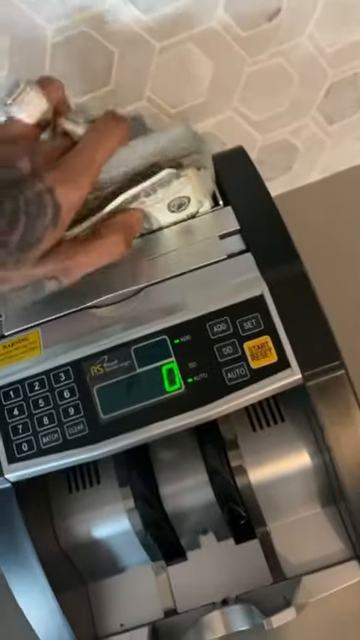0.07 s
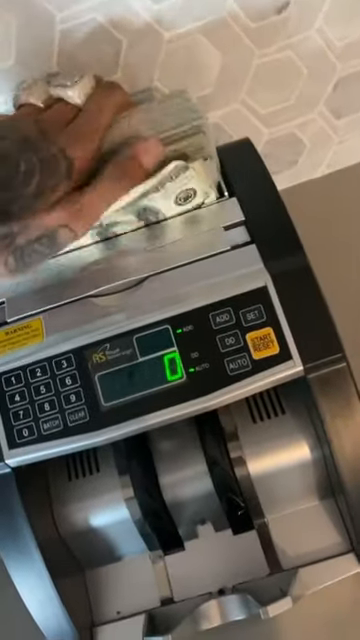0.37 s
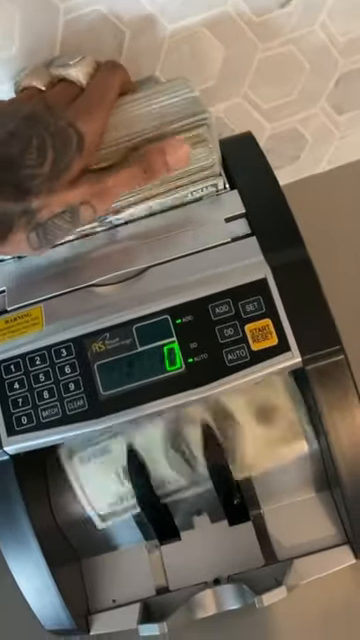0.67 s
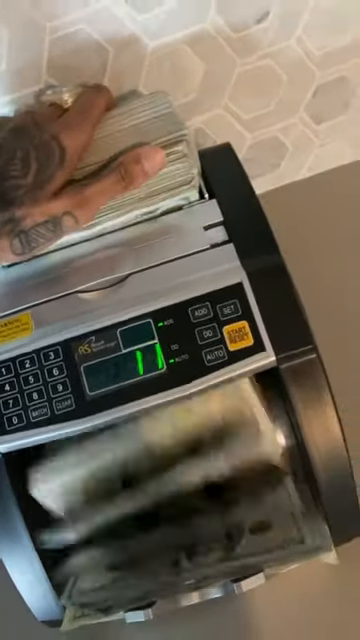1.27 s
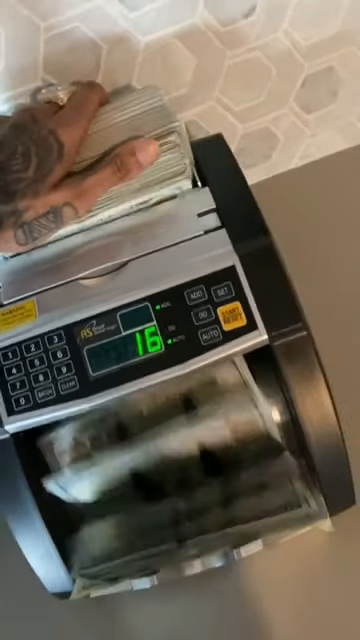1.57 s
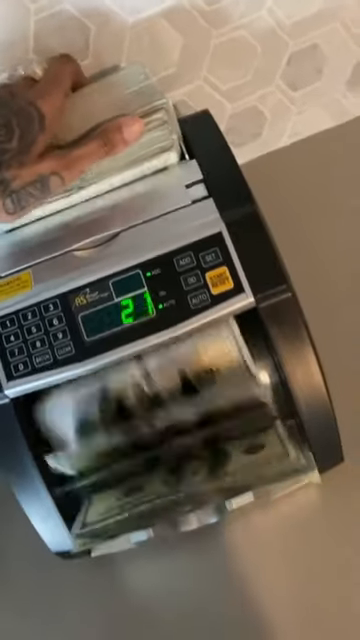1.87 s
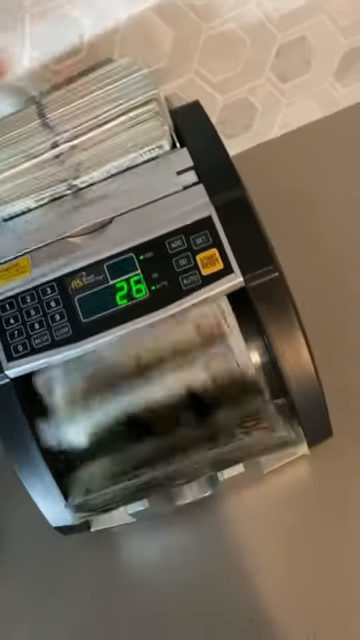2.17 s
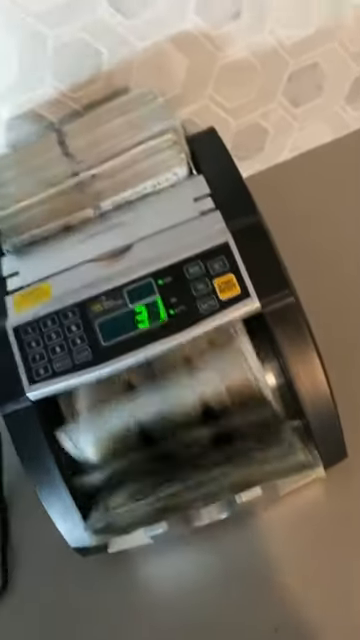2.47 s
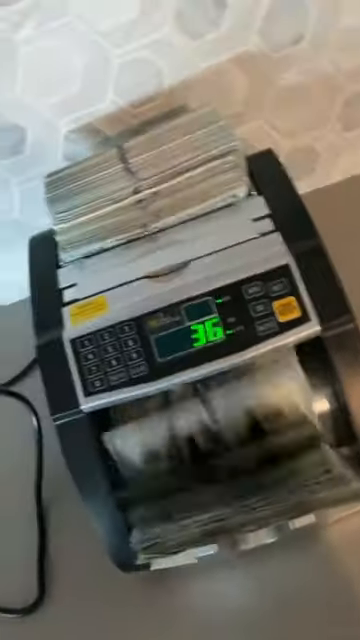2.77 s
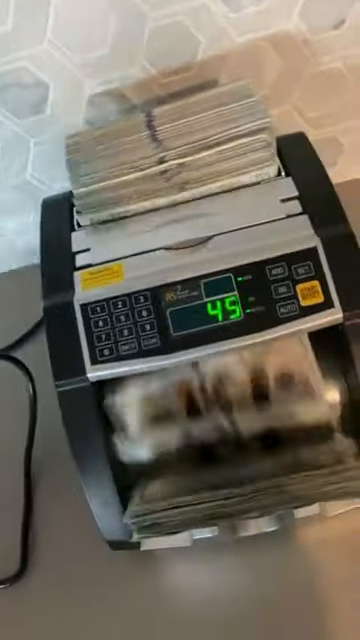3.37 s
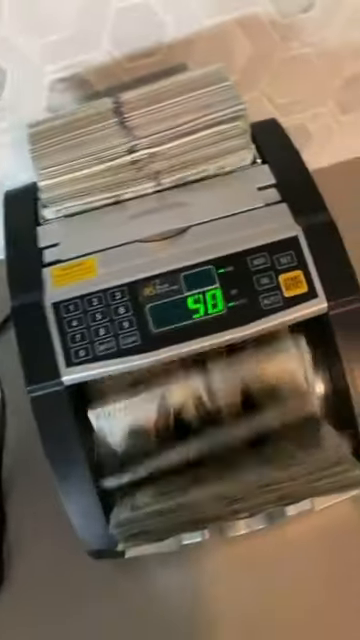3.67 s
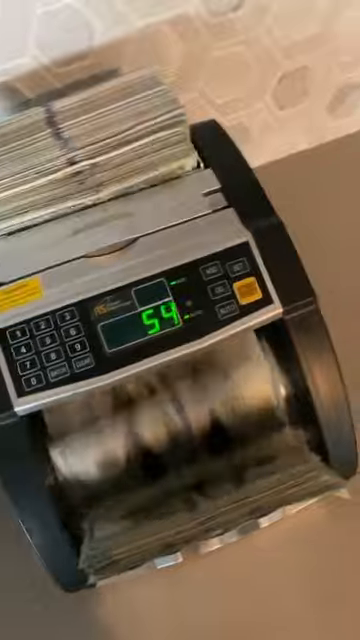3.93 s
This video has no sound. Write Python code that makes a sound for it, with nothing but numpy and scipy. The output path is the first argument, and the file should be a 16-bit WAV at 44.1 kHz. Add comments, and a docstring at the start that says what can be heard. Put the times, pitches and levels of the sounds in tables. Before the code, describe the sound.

A money counter riffles quickly through paper bills, starting just after a brief rustle and a few clicks of loading. Its motor hums and its plastic case rattles as the notes snap and chug through, heard close up indoors.

```python
"""A soft rustle and a few clicks, close by: a hand settles a stack in a banknote counter on a counter top.
Then the motor starts, and rollers rattle the plastic case over a mains hum and a gear whine.
About fifteen notes a second rub off the stack and snap into the stacker with a chug.
The case booms less as the tray fills, and a small hard room answers."""
import sys
import numpy as np
from scipy import signal
from scipy.fft import rfft, irfft
from scipy.io import wavfile
from scipy.ndimage import uniform_filter1d

SR = 44100
rng = np.random.default_rng(int(sys.argv[2]) if len(sys.argv) > 2 else 0)


def bounce(signal):
    """Save signal as a 16-bit WAV file at the path given by the first command-line argument."""
    frames = np.transpose(np.atleast_2d(signal))
    limited = np.clip(frames, -1, 1)
    pcm = np.round(limited * 32767).astype(np.int16)
    wavfile.write(sys.argv[1], SR, pcm)


N = 176400

# notes snapping into the stacker: start_s, level_db, treble_db, ring_hz, decay_s, top_db
# (levels are relative: treble to the snap's body, top to its treble)
SNAPS = [(0.6173, -10, 0.5, 2340, 0.0017, -4), (0.7297, -8.5, -9.5, 3740, 0.0027, -5),
         (0.7883, -6.5, -10, 2470, 0.0016, -6), (0.9564, -3.5, -8, 2900, 0.002, -1),
         (0.9981, -9, -28, 2310, 0.0016, 2), (1.1314, -10, -2.5, 2060, 0.0031, -0.5),
         (1.259, -12.5, -2, 2760, 0.006, -6), (1.361, -4, -10, 2430, 0.0018, 1),
         (1.5336, -14, -14, 2440, 0.0069, -3), (1.547, -12.5, -1, 4980, 0.0091, -10),
         (1.7091, -8.5, -7.5, 2610, 0.002, 5), (1.7693, -13, -8, 2970, 0.0035, -3),
         (2.1323, -11.5, -32, 1270, 0.0036, 0), (2.1952, -13, -2.5, 3900, 0.0037, -7),
         (2.2667, -6.5, -5, 2560, 0.0027, 0), (2.364, -25.5, 12, 5460, 0.0018, -18),
         (2.5205, -8.5, -11, 4560, 0.0029, -3), (2.6873, -10, 0.5, 4300, 0.0045, 3),
         (2.7025, -17, 5, 4500, 0.0027, -12), (2.7618, -22.5, 12, 4680, 0.0045, -7),
         (2.9553, -9.5, -6, 3830, 0.0051, -2.5), (3.032, -6.5, -3.5, 2240, 0.0035, -1),
         (3.1106, -9, -23, 2010, 0.003, -13), (3.1755, -9, -2.5, 2060, 0.011, 1),
         (3.2501, -14, -3.5, 2500, 0.0055, -13), (3.3127, -11, -2, 2540, 0.0046, -6),
         (3.4437, -11.5, -1.5, 2620, 0.0066, -1), (3.5099, -7, -5.5, 2300, 0.0097, -16),
         (3.5813, -7.5, -2.5, 4500, 0.0053, -1.5), (3.6479, -14, -4, 4270, 0.0051, -2),
         (3.7713, -4, -49, 2070, 0.0057, -4), (3.8331, -10, -1, 2370, 0.006, 1)]
# the rubbing as heard, with the highs stepping down above 9 kHz: frequency_hz, gain_db
RUB_COLOUR = [(30, -13), (300, -6.5), (1000, -1), (1750, -0.5), (2100, -0.5), (2700, -0.5), (3250, 1),
              (4000, 3.5), (4500, 0), (5300, -2.5), (6300, -1), (7700, 0), (8500, -1.5), (9500, -15),
              (14000, -8.5)]
SNAP_TRIM_DB, TRAY_KNOCK_HZ = -9, 436


def undb(db):
    """Decibels to gain."""
    return 10 ** (np.asarray(db) / 20)


def unit(x):
    """Scale to rms 1."""
    return x / np.sqrt(np.mean(x ** 2))


def burst(x):
    """Scale so that the loudest 4 ms have rms 1."""
    return x / np.sqrt(uniform_filter1d(x ** 2, size=176).max())


def fader(t, points):
    """Gain riding along (time_s, level_db) points."""
    return undb(np.interp(t, *np.array(points).T))


def wander(per_s):
    """Smooth random drift, rms 1."""
    hold = int(SR / per_s)
    steps = rng.standard_normal(2048)[np.arange(N) // hold]
    return unit(uniform_filter1d(uniform_filter1d(steps, hold), hold))


def ring(x, hz, width_hz):
    """One resonance, gain 1 at its centre."""
    return signal.lfilter(*signal.iirpeak(hz, hz / width_hz, fs=SR), x)


def noise_band(size, hz, width_hz):
    """Noise in a steep resonance, rms 1."""
    return unit(ring(ring(rng.standard_normal(size), hz, width_hz), hz, width_hz))


def colour(x, points):
    """Minimum-phase EQ through (frequency_hz, gain_db) points: nothing rings ahead of a click."""
    hz, db = np.array(points).T
    size = 2048
    log_hz = np.log(np.fft.rfftfreq(size, 1 / SR) + 1)
    gain = undb(np.interp(log_hz, np.log(hz), db))
    cepstrum = irfft(np.log(gain))
    cepstrum[1:size // 2] *= 2
    cepstrum[size // 2:] = 0
    impulse = irfft(np.exp(rfft(cepstrum)))[:size // 2]
    return signal.fftconvolve(x, impulse)[:len(x)]


def grains(per_s, size):
    """Tiny clicks of random strength at random moments, rms 1."""
    return unit(rng.standard_normal(size) * (rng.random(size) < per_s / SR))


def add(out, start_s, x):
    """Mix a sound in at its cue."""
    i = int(start_s * SR)
    out[i:i + len(x)] += x[:len(out) - i]


def thumps(t, cues, pitch_hz, length_s):
    """Short dull blows of a few cycles, one for each (start_s, level_db) cue."""
    out, u = np.zeros(N), t[:SR // 10]
    blow = burst(np.sin(2 * np.pi * pitch_hz * u) * u * np.exp(-2 * u / length_s))
    for start_s, level_db in cues:
        add(out, start_s, undb(level_db) * blow)
    return out


def feed_cycle(t, notes_per_s=14.7):
    """The load swings once a note from the first snap to the last; quiet notes fill the gaps."""
    snap_times = np.sort([row[0] for row in SNAPS])
    notes_per_gap = np.round(np.diff(snap_times) * notes_per_s)
    notes_fed = np.concatenate([[0], np.cumsum(notes_per_gap)])
    return np.sqrt(2) * np.cos(2 * np.pi * np.interp(t, snap_times, notes_fed))


def loading(t):
    """The stack rustles softly under the hand and clicks against the hopper."""
    # the hand sliding on the stack: time_s, level_db
    hand_levels = [(0, -42), (.05, -55.5), (.11, -51), (.19, -66), (.21, -50.5), (.32, -64), (.36, -57),
                   (.48, -57), (.6, -75)]
    # the rustle as heard, with the highs stepping down above 9 kHz: frequency_hz, gain_db
    hand_colour = [(200, 4.5), (1400, -5.5), (2400, -1), (4500, -6.5), (8700, -13), (9600, -21),
                   (14000, -21)]
    # the stack tapping the hopper: start_s, level_db
    taps = [(0.0605, -35), (0.2004, -36), (0.274, -54), (0.3412, -47), (0.4030, -24.5)]
    # a tap as heard, with the highs stepping down above 9 kHz: frequency_hz, gain_db
    tap_colour = [(30, -31), (150, 0), (900, -1.5), (1500, -5), (2200, 9), (3200, 3), (3700, 2),
                  (5000, -0.5), (7000, -8), (8700, 2), (9600, -16), (14000, -18)]
    out = unit(colour(grains(per_s=14000, size=N), hand_colour)) * fader(t, hand_levels)
    u, tap_decay_s = t[:SR // 10], 0.0033
    for start_s, level_db in taps:
        click = rng.standard_normal(len(u)) * np.sqrt(u) * np.exp(-u / tap_decay_s)
        add(out, start_s, undb(level_db) * burst(colour(click, tap_colour)))
    return out


def rollers(t, trim_db=-0.5):
    """Rollers and stacker vanes pepper the plastic case with tiny blows that set it rattling."""
    # resonances of the case: pitch_hz, width_hz, gain_db
    case_modes = [(221, 55, -5), (372.4, 41.3, 1.5), (434, 71.4, -1), (497.4, 89, -1.5), (621, 84, -4.5),
                  (871, 62, -6), (1119, 23, -8.5), (1334, 29, -12.5), (1650, 43, -25.5)]
    # the rattle, easing as the tray fills: time_s, level_db (before the trim)
    rattle_levels = [(.45, -83), (.5, -42.5), (.57, -28), (.63, -23.5), (1.0, -25), (1.2, -26.5),
                     (1.45, -25.5), (2.3, -29), (4, -31)]
    blows = grains(per_s=900, size=N)
    case = sum((-1) ** k * undb(gain_db) * ring(blows, hz, width_hz)  # modes alternate in polarity
               for k, (hz, width_hz, gain_db) in enumerate(case_modes))
    return unit(case) * fader(t, rattle_levels) * undb(trim_db)


def rubbing(t):
    """Paper hisses and crackles as each note is pulled off the stack, ringing now one guide, now another."""
    # paper running through the rollers: time_s, level_db
    rub_levels = [(.46, -84), (.5, -39), (.535, -35.5), (.555, -24), (.64, -24.5), (.76, -24), (.85, -27.5),
                  (1.1, -25), (1.35, -28), (1.8, -29), (2.3, -29), (2.48, -26), (2.7, -22.5), (2.8, -28.5),
                  (2.95, -30), (3.4, -30), (4, -30)]
    # resonances of the paper guides: pitch_hz
    guide_pitches = [2390, 2660, 4530, 4840, 5320]
    crackle_db, pulse_db, flicker_db = -4, 1.1, 1.9
    guide_db, guide_waver_db = -6, 4
    friction = rng.standard_normal(N) + undb(crackle_db) * grains(per_s=1500, size=N)
    force = friction * undb(pulse_db * feed_cycle(t) + flicker_db * wander(per_s=110))
    guides = sum(ring(force * undb(guide_waver_db * wander(per_s=40.1)), hz, width_hz=190)
                 for hz in guide_pitches)
    rub = unit(unit(colour(force, RUB_COLOUR)) + undb(guide_db) * unit(guides))
    hiss = signal.sosfiltfilt(signal.butter(6, 8800, "high", fs=SR, output="sos"), rub)
    hiss_lift = fader(t, [(2.0, 3), (2.8, 0.5)])  # the top softens partway through the run
    return (rub + hiss * (hiss_lift - 1)) * fader(t, rub_levels)


def motor(t, start_s=0.54, spin_up_s=0.11):
    """Mains hum, bearing rumble and wavering gear tones fade in; the gears throb with each note."""
    # gear whine: pitch_hz, level_db
    gear_tones = [(366, -42.5), (501.5, -42), (673, -50), (911, -49)]
    hum_hz, hum_db, hum_waver_db, rumble_db = 119.4, -41.5, 0.5, -48.5
    speed_jitter, gear_waver_db, throb_db, throb_lag_s = 0.011, 3.5, 3.2, 0.008
    hum = np.sqrt(2) * undb(hum_db + hum_waver_db * wander(per_s=12)) * np.sin(2 * np.pi * hum_hz * t)
    gear_time = np.cumsum(1 + speed_jitter * wander(per_s=70)) / SR
    load = feed_cycle(t - throb_lag_s)
    whine = np.zeros(N)
    for hz, level_db in gear_tones:
        swell = undb(gear_waver_db * wander(per_s=30) + throb_db * load)
        whine += undb(level_db) * unit(swell * np.sin(2 * np.pi * hz * gear_time))
    rumble = undb(rumble_db) * noise_band(N, hz=108, width_hz=40)
    return (hum + rumble + whine) * np.clip((t - start_s) / spin_up_s, 0, 1)


def drags(t, below_snap_db=22, rise_s=0.0043):
    """A note scrapes louder for a moment until it snaps free."""
    out, u = np.zeros(N), t[:SR // 20]
    swell = np.exp((u - u[-1]) / rise_s)
    for snap_s, level_db, *_ in SNAPS:
        scrape = burst(colour(rng.standard_normal(len(u)) * swell, RUB_COLOUR))
        add(out, snap_s - u[-1], undb(level_db + SNAP_TRIM_DB - below_snap_db) * scrape)
    return out


def snaps(t):
    """A note cracks taut in a cluster of clicks, rings briefly, strikes the tray and slides to rest."""
    # tone of a snap's body: frequency_hz, gain_db
    body_colour = [(30, -35), (200, -21), (900, 3), (1700, -5), (2300, 2.5), (2900, 1), (3900, 4),
                   (5000, -1.5), (14000, -43)]
    # its crisp edge as heard, with the highs stepping down above 9 kHz: frequency_hz, gain_db
    edge_colour = [(2000, -23.5), (3600, 2.5), (4400, 17), (6200, 8.5), (8300, 8), (9500, -7.5),
                   (14000, -4.5)]
    # resonances of the stacker tray: pitch_hz, width_hz, gain_db
    tray_modes = [(910, 82, -2), (1173, 47, 5.5), (1282, 81, 3.5), (1615, 87, 3.5), (2080, 85, 8),
                  (2500, 80, 4.5), (2640, 150, 1.5)]
    rise_s, slide_s, slide_db = 0.00075, 0.016, -24.5
    tray_db, edge_lift_db, thud_db = -1.5, 3.5, -16.5
    pop_width_hz, thud_width_hz = 350, 270
    out, u = np.zeros(N), t[:SR // 10]
    attack = np.minimum(u / rise_s, 1)
    since_peak = np.maximum(u - 2 * rise_s, 0)
    slide = undb(slide_db) * np.exp(-since_peak / slide_s)
    for start_s, level_db, treble_db, ring_hz, decay_s, top_db in SNAPS:
        release = np.exp(-(since_peak / decay_s) ** 2 / 2)
        crack = grains(per_s=9000, size=len(u)) * attack * (release + slide)
        tray = burst(sum(undb(db) * ring(crack, hz, width_hz) for hz, width_hz, db in tray_modes))
        pop = burst(np.sin(2 * np.pi * ring_hz * u) * u * np.exp(-np.pi * pop_width_hz * u))
        pop_db = 1.5 - 0.18 * treble_db  # duller snaps ring more
        body = burst(burst(colour(crack, body_colour)) + undb(tray_db) * tray + undb(pop_db) * pop)
        top_shelf = [(5030, 0), (7500, top_db)]
        edge = colour(burst(colour(crack, edge_colour)), top_shelf)
        thud = burst(ring(ring(crack, TRAY_KNOCK_HZ, thud_width_hz), TRAY_KNOCK_HZ, thud_width_hz))
        snap = body + undb(treble_db + edge_lift_db) * edge + undb(thud_db) * thud
        add(out, start_s, undb(level_db + SNAP_TRIM_DB) * snap)
    return out


def bumps(t):
    """Two dull low bumps, one early in the run and one late."""
    # low bumps: start_s, level_db
    cues = [(.655, -40), (3.724, -34)]
    return thumps(t, cues, pitch_hz=88, length_s=0.014)


def landings(t, pitch_hz=505, pitch_spread=0.035, rise_s=0.011):
    """The chug: a note swishes into the stacker, which swells into a short, rough ring."""
    # notes thumping the stacker: start_s, level_db (before the trim)
    cues = [(0.728, -24), (0.826, -27), (0.9, -26), (1.141, -21.5), (1.203, -21.5), (1.249, -25.5),
            (1.307, -20.5), (1.371, -28), (1.414, -15.5), (1.468, -21.5), (1.531, -18), (1.584, -19),
            (1.65, -19), (1.699, -30), (1.762, -20), (1.826, -18.5), (1.893, -18), (1.956, -24),
            (2.076, -25), (2.138, -28), (2.325, -23.5), (2.41, -21.5), (2.503, -39), (2.68, -24.5),
            (2.742, -26), (2.825, -19.5), (2.893, -26), (2.948, -29), (3.038, -25), (3.103, -28),
            (3.169, -26.5), (3.253, -30), (3.387, -23.5), (3.456, -33), (3.513, -30), (3.587, -23.5),
            (3.653, -29), (3.713, -23.5), (3.837, -29), (3.954, -30)]
    trim_db, rough_db, swish_db = -1.5, -9, -30
    out, u = np.zeros(N), t[:SR // 10]
    swell = (u / rise_s) ** 2 * np.exp(-2 * u / rise_s)
    for start_s, level_db in cues:
        hz = pitch_hz * (1 + pitch_spread * rng.standard_normal())
        tone = np.sqrt(2) * np.sin(2 * np.pi * (hz * u + rng.random()))
        roughness = undb(rough_db) * noise_band(len(u), hz, width_hz=hz)
        chug = burst(swell * (tone + roughness))
        swish = burst(colour(swell * rng.standard_normal(len(u)), RUB_COLOUR))
        add(out, start_s, undb(level_db + trim_db) * chug + undb(swish_db) * swish)
    return out


def knocks(t):
    """Early notes knock on the nearly empty tray."""
    # knocks on the tray: start_s, level_db
    cues = [(.942, -12.5), (1, -13), (1.0578, -14.5)]
    return thumps(t, cues, TRAY_KNOCK_HZ, length_s=0.0025)


def room(dry, t, wet_db=-16.5, t60_s=0.24, predelay_s=0.0021, air_db=-57):
    """The wall and counter top add dense reflections, over a faint bed of room tone."""
    # room tone: frequency_hz, gain_db
    air_colour = [(25, -9), (65, 18), (250, 1), (450, 8), (1500, -12), (6000, -33), (14000, -50)]
    u = t[:SR // 2]
    tail = grains(per_s=4000, size=len(u)) * undb(-60 * u / t60_s) * (u > predelay_s)
    reflections = signal.fftconvolve(dry, tail / np.linalg.norm(tail))[:N]
    air = unit(colour(rng.standard_normal(N), air_colour))
    return dry + undb(wet_db) * reflections + undb(air_db) * air


def scene():
    """Machine and hand in the room, the same in both ears."""
    t = np.arange(N) / SR
    machine = motor(t) + rollers(t) + bumps(t) + landings(t) + knocks(t)
    paper = rubbing(t) + drags(t) + snaps(t) + loading(t)
    mix = room(machine + paper, t)
    return np.array([mix, mix])


def record(dry):
    """A steep low-pass takes off the very top."""
    cutoff_hz = 13950
    return signal.sosfilt(signal.ellip(12, .2, 80, cutoff_hz, fs=SR, output="sos"), dry)


dry = scene()
out = record(dry)
bounce(out)
```